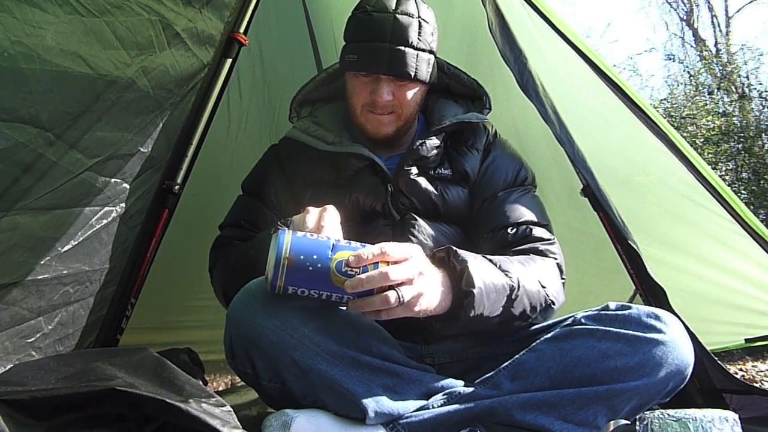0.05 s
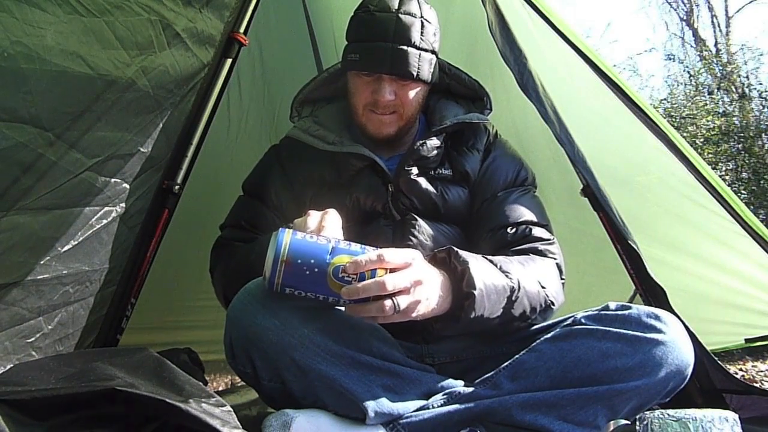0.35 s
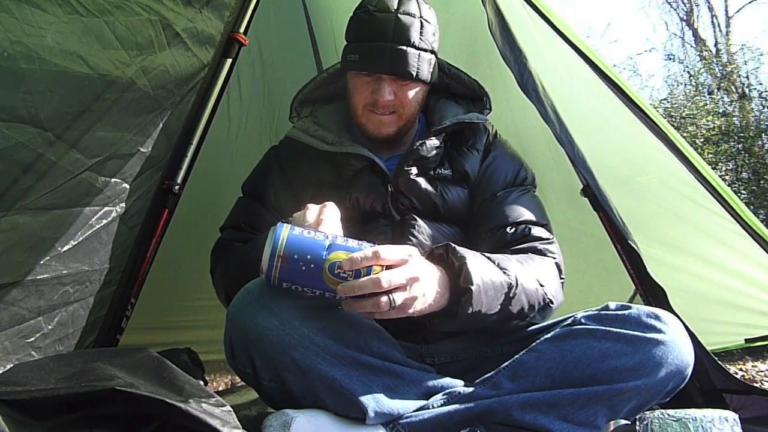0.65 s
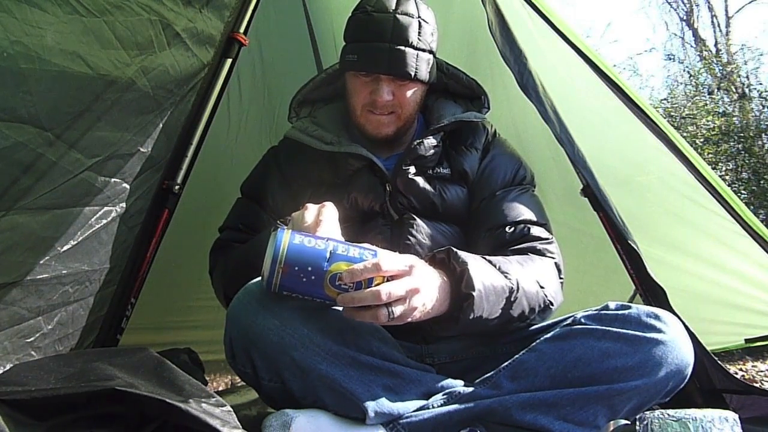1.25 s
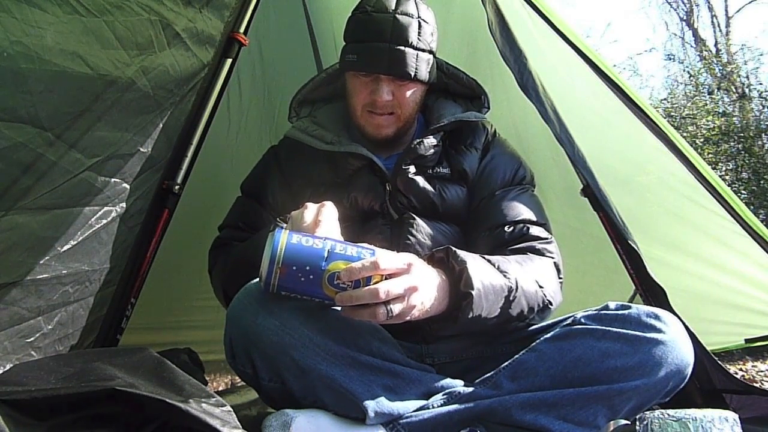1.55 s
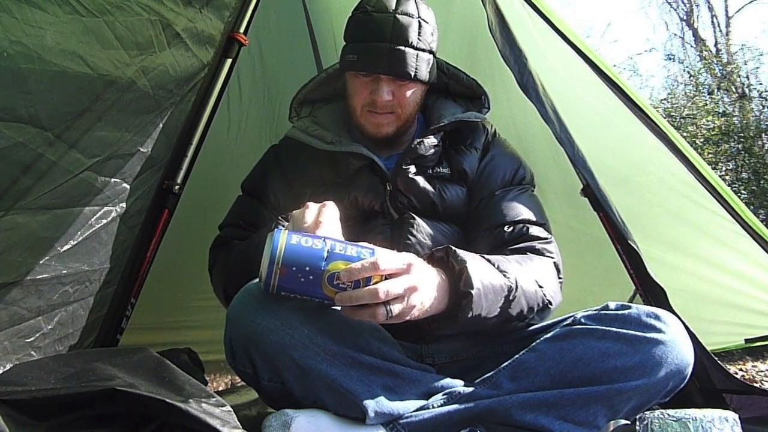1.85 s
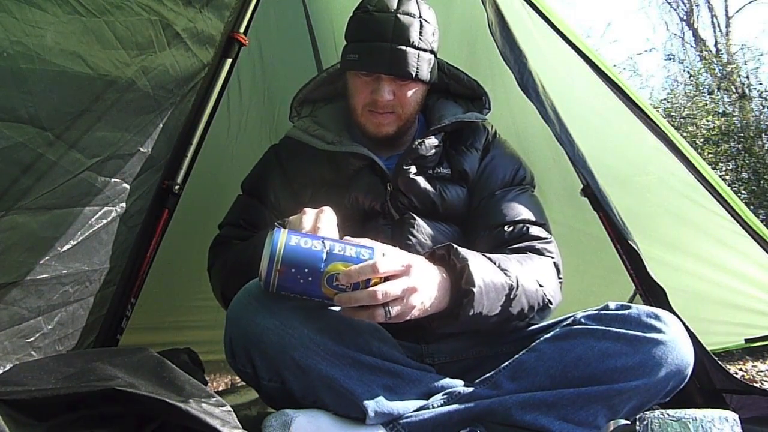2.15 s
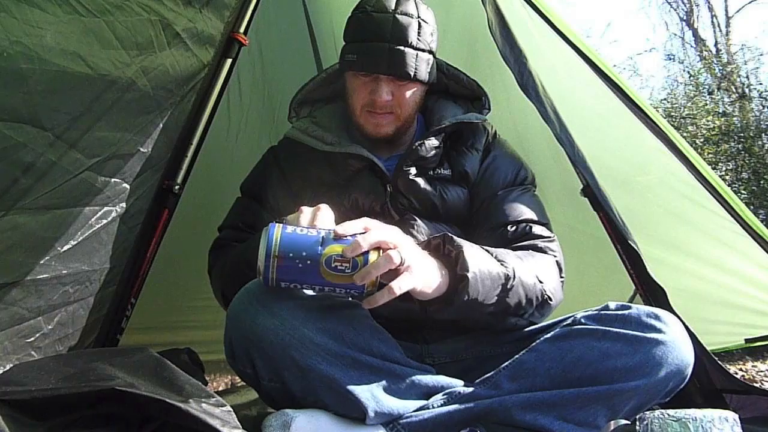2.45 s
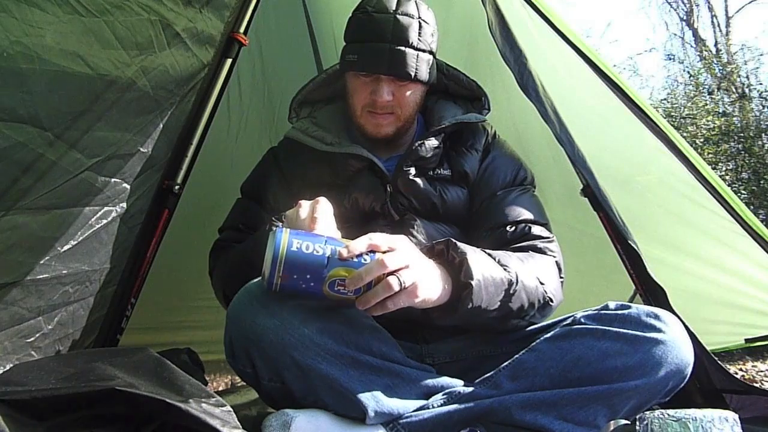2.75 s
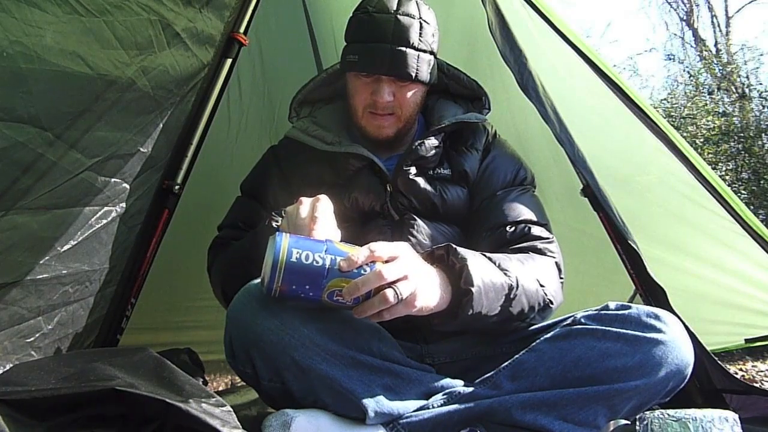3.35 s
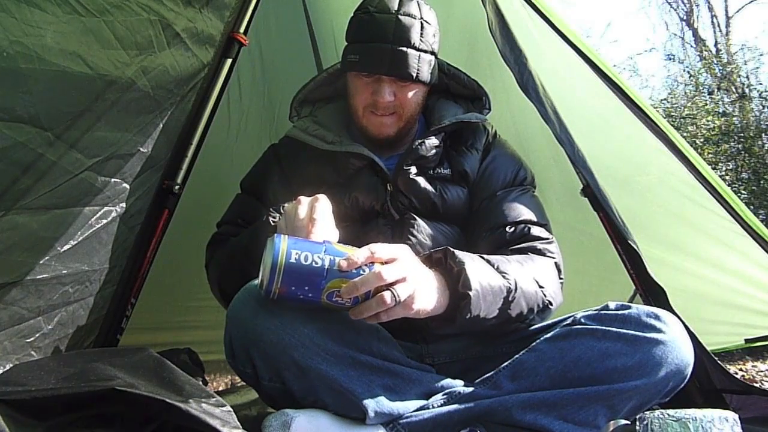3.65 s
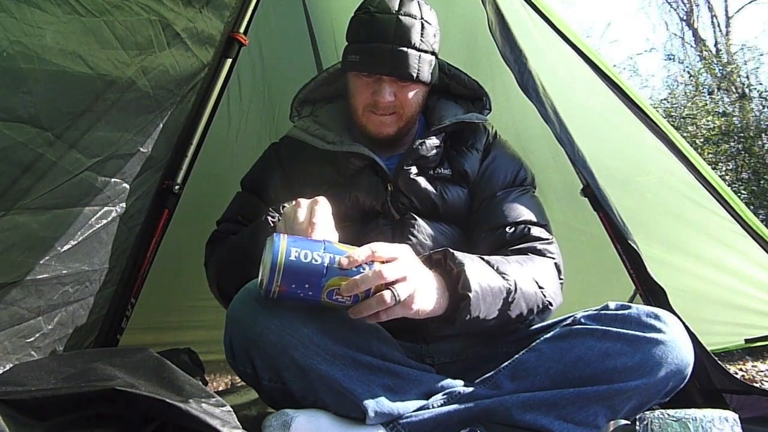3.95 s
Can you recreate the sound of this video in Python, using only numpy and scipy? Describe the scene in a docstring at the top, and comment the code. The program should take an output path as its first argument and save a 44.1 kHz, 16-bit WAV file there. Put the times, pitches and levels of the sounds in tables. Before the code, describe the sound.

A thin metal can is cut close by, with short scrapes, a loud hollow pop near 0.35 seconds and sharp snaps around 0.9 and 1.15. After a pause, scraping resumes at 1.8, snaps cluster from 2.2 to 2.6 and near 3.2, and hollow pops follow at 3.6 and 4. Low wind and a distant, sinking engine drone continue underneath, with faint bird chirps near 1.5 and 3.7.

```python
"""Cutting a thin metal can

A can is cut and turned by hand in an open tent. The sheet scrapes in stick-slip grains, tears in snaps
made of tiny cracks, and now and then buckles with a hollow pop.
Behind it: low wind, a far engine drone that sinks in pitch, a low hum and faint birds."""
import sys
import numpy as np
from scipy import signal
from scipy.fft import rfft, irfft
from scipy.io import wavfile
from scipy.ndimage import uniform_filter1d

SR = 44100
rng = np.random.default_rng(int(sys.argv[2]) if len(sys.argv) > 2 else 0)


def digitize_waveform(pressure):
    """Quantize a signal to 16-bit integers and store it at the path in sys.argv[1].

    Rows of a 2-D input are taken as channels; values are limited to [-1, 1].
    """
    field = np.atleast_2d(pressure).T
    bounded = np.clip(field, -1, 1)
    quanta = np.round(bounded * 32767).astype(np.int16)
    wavfile.write(sys.argv[1], SR, quanta)


N = 176400

# Wall spectrum for scrapes and pop ticks: freq_hz, gain_db
SCRAPE_SPECTRUM = [(100, -22), (300, -1.5), (750, -1), (1000, -4), (1250, 3), (1900, -0.5), (2200, -4),
                   (2550, -1), (3900, -5), (4800, -2.5), (5900, -1.5), (7500, -17.5)]


def undb(db):
    """Decibels to gain."""
    return 10 ** (np.asarray(db) / 20)


def unit(x):
    """Scale to rms 1."""
    return x / np.sqrt(np.mean(x ** 2) + 1e-24)


def decay(t, t60_s):
    """Exponential fade, 60 dB down at t60_s."""
    return np.exp(-np.log(1000) * t / t60_s)


def walk(rate_hz, size):
    """Smooth random drift, spread near 1."""
    hold = max(int(SR / rate_hz), 2)
    steps = np.repeat(rng.standard_normal(size // hold + 1), hold)
    return 1.004 * uniform_filter1d(steps, hold)[:size]


def resonate(x, hz, width_hz):
    """One resonance, gain 1 at its centre."""
    return signal.lfilter(*signal.iirpeak(hz, hz / width_hz, fs=SR), x)


def colour(x, points, size=4096):
    """Minimum-phase filter through (freq_hz, gain_db) points."""
    hz, db = np.array(points).T
    grid_hz = np.maximum(np.fft.rfftfreq(size, 1 / SR), 1)
    gain = undb(np.interp(np.log(grid_hz), np.log(hz), db))
    cepstrum = irfft(np.log(gain))
    cepstrum[1:size // 2] *= 2
    cepstrum[size // 2 + 1:] = 0
    return signal.fftconvolve(x, irfft(np.exp(rfft(cepstrum))))[:len(x)]


def registers(x, low_hz=756, high_hz=3040):
    """Split into bass, middle and treble."""
    edges = [(low_hz, "low"), ([low_hz, high_hz], "band"), (high_hz, "high")]
    return [signal.sosfilt(signal.butter(4, hz, kind, fs=SR, output="sos"), x) for hz, kind in edges]


def add(out, start_s, x):
    """Mix x in at start_s, cropped to out."""
    i = int(round(start_s * SR))
    x, i = x[max(-i, 0):], max(i, 0)
    out[i:i + len(x)] += x[:max(len(out) - i, 0)]


def grains(per_s, spread_db, size):
    """Random impulses of uneven strength and sign."""
    hits = rng.random(size) < per_s / SR
    return hits * undb(spread_db * rng.standard_normal(size)) * rng.choice([-1, 1], size)


def burst_level(x, db, window_s=0.009):
    """Scale x to the energy of rms level db held for window_s."""
    return undb(db) * x * np.sqrt(window_s * SR / np.sum(x ** 2))


def wind(base_db=-42, gust_db=-1.5):
    """Low wind and leaf hiss, swaying in small gusts."""
    # Noise spectrum: freq_hz, density_db
    spectrum = [(12, -31), (20, -16.5), (27, -40.5), (43, -29), (71, -16), (95, -13.5), (113, -8),
                (157, -15.5), (191, -19), (314, -27), (1140, -41), (1230, -43.5), (6460, -55.5),
                (7500, -62.5), (9750, -100), (16500, -120)]
    # Background level, dipping after the loudest snaps: time_s, gain_db
    background_level = [(0, 7), (.6, 3), (1.6, 3.5), (2.3, 2.5), (3.3, 0), (4, 4)]
    air = unit(colour(rng.standard_normal(N), spectrum))
    gain_db = np.interp(np.arange(N) / SR, *np.array(background_level).T)
    return air * undb(base_db + gain_db + gust_db * walk(rate_hz=14, size=N))


def engine(wobble=0.02143, waver_db=1.5):
    """A far engine's tone sinks in pitch and wavers on its way."""
    # Engine tone: time_s, pitch_hz, level_db
    drone = [(0, 117, -39), (.5, 115.7, -38), (0.752, 114.1, -36.5), (1.0, 115.9, -38.5), (1.3, 112.5, -36),
             (1.498, 108.2, -35), (1.68, 108.2, -32), (2.1, 103.3, -40), (2.28, 102.8, -47),
             (2.55, 102.4, -40.5), (2.9, 101, -39), (3.14, 100.3, -35), (3.28, 94.6, -49.5),
             (3.6, 92.2, -43.5), (4, 93, -47.5)]
    t = np.arange(N) / SR
    time_s, pitch_hz, level_db = np.array(drone).T
    hz = np.interp(t, time_s, pitch_hz) * (1 + wobble * walk(rate_hz=20, size=N))
    db = np.interp(t, time_s, level_db) + waver_db * walk(rate_hz=27, size=N)
    return np.sqrt(2) * np.sin(2 * np.pi * np.cumsum(hz) / SR) * undb(db)


def hum(centre_hz=67, width_hz=43, level_db=-52):
    """A low, steady band of noise."""
    band = resonate(rng.standard_normal(N), centre_hz, width_hz)
    return undb(level_db) * unit(resonate(band, centre_hz, width_hz))


def birds(size=20000, waver=0.014, trees_t60_s=0.6, trees_db=-1.0, trees_lag_s=0.012):
    """Thin chirps arch up and drop, loudest on the way down; the trees echo them."""
    # Far chirps: start_s, length_s, top_hz, peak_db
    chirps = [(1.388, 0.057, 5720, -56.5), (1.487, 0.083, 5740, -68), (1.69, 0.03, 5360, -56),
              (3.681, 0.046, 5620, -55), (3.742, 0.049, 5436, -57)]
    out, t = np.zeros(N), np.arange(size) / SR
    for start_s, length_s, top_hz, peak_db in chirps:
        progress = t / length_s
        arch = np.interp(progress, [0, 0.63, 1], [0.958, 1, 0.9])
        hz = top_hz * arch * (1 + waver * walk(rate_hz=430, size=size))
        envelope = np.interp(progress, [0, 0.8, 1], [0, 1, 0])
        note = undb(peak_db) * envelope * np.sin(2 * np.pi * np.cumsum(hz) / SR)
        trees = unit(rng.standard_normal(size) * decay(t, trees_t60_s)) / np.sqrt(size)
        add(out, start_s, note)
        add(out, start_s + trees_lag_s, undb(trees_db) * signal.fftconvolve(note, trees)[:size])
    return out


def can_wall(push, modes_db=-10, size=11025):
    """A push excites a sharp front, a hand-damped wash and a few modes; the tent adds a brief tail."""
    # Wall modes: freq_hz, relative_db, t60_s
    wall_modes = [(309.2, -9.5, 0.32), (428, -10.5, .35), (606.5, -11.5, 0.16), (718.4, -11, 0.13),
                  (1280, -2.5, 0.11), (1928, -3.5, .1), (2019, -5.5, 0.1), (2426, -1, 0.079),
                  (2517, -2, 0.11), (2712, -2, 0.067), (2918, -9.5, .1), (3550, -8.5, 0.075),
                  (4340, -4, 0.059), (4920, -2.5, .055), (5720, -3.5, 0.077), (7040, -4.5, 0.07)]
    scatter_db = 4  # mode levels change with the contact point
    front_db, tent_db = -7.5, -9  # relative to the wash, as is modes_db
    wash_t60_s, tent_t60_s = 0.026, 0.063
    t, modes = np.arange(size) / SR, np.zeros(size)
    for hz, db, t60_s in wall_modes:
        gain = undb(db + scatter_db * rng.standard_normal())
        modes += gain * np.sin(2 * np.pi * (hz * t + rng.random())) * decay(t, t60_s)
    front = undb(front_db) * unit(signal.unit_impulse(size))
    wash = unit(rng.standard_normal(size) * decay(t, wash_t60_s))
    tent = undb(tent_db) * unit(rng.standard_normal(size) * decay(t, tent_t60_s))
    response = front + wash + undb(modes_db) * unit(modes) + tent
    return signal.fftconvolve(push, response)[:len(push)]


def scrapes(size=14000, contacts=3, grains_per_s=2600, flutter_db=1.5, ring_db=2, bass_offset_db=-5.5):
    """Stick-slip grains at several contacts shake the wall and the hollow; strokes swell and fade."""
    # Strokes: start_s, crest_s, end_s, hollow_db, middle_db, treble_db, hollow_hz, ring_hz
    strokes = [(-.03, 0.013, 0.083, -23, -32.5, -37, 417.3, 1480),
               (0.179, 0.235, 0.28, -35.5, -52, -57, 418, 2480),
               (0.293, 0.34, 0.35, -41.5, -58.5, -68, 422, 2580),
               (0.543, 0.554, 0.6, -46.5, -54, -62, 403, 1880),
               (0.667, 0.74, 0.79, -34, -44, -47.5, 408, 1970),
               (0.805, 0.846, 0.88, -33, -41.5, -43.5, 400, 5720),
               (0.864, 0.878, 1, -34, -43, -45.5, 420, 1320),
               (1.053, 1.09, 1.12, -32, -48.5, -54.5, 407.7, 1340),
               (1.794, 1.809, 1.94, -40, -53, -58, 434, 2630),
               (1.879, 1.947, 2.017, -37.5, -47.5, -54.5, 442, 2870),
               (2.044, 2.085, 2.18, -41, -50.5, -56.5, 470, 2640),
               (2.081, 2.101, 2.14, -37, -38, -42.5, 452.6, 1900),
               (2.517, 2.529, 2.71, -52.5, -55.5, -56, 449, 1981),
               (2.621, 2.654, 2.8, -48.5, -48.5, -54.5, 442, 1850),
               (2.772, 2.777, 2.868, -51, -44.5, -48, 441.6, 1856),
               (2.894, 2.904, 3.04, -47.5, -47.5, -51.5, 430.8, 4910),
               (2.912, 2.957, 3.1, -41.5, -46, -54.5, 744, 1129),
               (2.995, 3.005, 3.14, -45, -57.5, -60, 442, 1280),
               (3.045, 3.06, 3.096, -38.5, -43.5, -53, 465, 1280),
               (3.714, 3.724, 3.755, -41, -69, -63, 440, 1280),
               (3.822, 3.826, 4.9, -46, -67, -68, 456, 601),
               (3.874, 3.886, 4.44, -39, -58, -56.5, 497, 4830),
               (3.89, 3.987, 4.15, -30, -46, -50.5, 485, 583)]
    out, t = np.zeros(N), np.arange(size) / SR
    for start_s, crest_s, end_s, hollow_db, middle_db, treble_db, hollow_hz, ring_hz in strokes:
        grip = undb(flutter_db * walk(rate_hz=78, size=size))
        pushes = [grip * grains(grains_per_s / contacts, spread_db=3.5, size=size)
                  for _ in range(contacts)]
        wall = colour(sum(can_wall(push, size=5000) for push in pushes), SCRAPE_SPECTRUM)
        bass, middle, treble = registers(wall + undb(ring_db) * resonate(wall, ring_hz, width_hz=79))
        hollow = resonate(sum(pushes), hollow_hz, width_hz=36)
        hollow = resonate(hollow, hollow_hz, width_hz=0.3 * hollow_hz)  # steeper skirts
        force = np.interp(start_s + t, [start_s, crest_s, end_s], [0, 1, 0]) ** 0.84
        parts = [(hollow, hollow_db), (bass, middle_db + bass_offset_db),
                 (middle, middle_db), (treble, treble_db)]
        stroke = sum(undb(db) * unit(force * band) for band, db in parts)
        add(out, start_s, stroke * np.sqrt(np.mean(force ** 2)))
    return out


def pops(size=9000, rise_s=0.00087, knock_db=-14):
    """The wall buckles: the hollow can rings briefly, with a dull knock and a faint tick."""
    # Buckles: start_s, pitch_hz, level_db, tick_db, t60_s
    buckles = [(0.0703, 421, -20.5, -55, 0.062), (0.3497, 427, -10, -42.5, 0.05),
               (.706, 402, -24.5, -53, 0.065), (.893, 424, -29, -39, 0.22), (1.163, 418, -31, -56, 0.14),
               (2.307, 430, -20.5, -49.5, 0.055), (3.5699, 479.7, -15.5, -41, 0.046),
               (3.734, 378, -25.5, -56, 0.022), (3.9625, 505, -16, -40, 0.037)]
    out, t = np.zeros(N), np.arange(size) / SR
    for start_s, pitch_hz, level_db, tick_db, t60_s in buckles:
        envelope = (1 - np.exp(-t / rise_s)) * decay(t, t60_s)
        knock = resonate(rng.standard_normal(size), pitch_hz, width_hz=pitch_hz / 2)
        knock = unit(resonate(knock, pitch_hz, width_hz=pitch_hz))
        hollow = envelope * (np.sin(2 * np.pi * pitch_hz * t) + undb(knock_db) * knock)
        tick = colour(can_wall(signal.unit_impulse(size)), SCRAPE_SPECTRUM)
        add(out, start_s, undb(level_db) * hollow + burst_level(tick, tick_db))
    return out


def snaps(size=13000, cracks_per_s=1300, crack_db=-14.5, low_ring_db=5.5, high_ring_db=0.5):
    """The sheet tears: one main crack early in a burst of small ones rings the nearby wall."""
    # Tears: start_s, tear_s, bass_db, middle_db, treble_db, low_ring_hz, high_ring_hz, modes_db
    tears = [(0.3741, .006, -35, -40, -31, 1255, 5300, -9.5),
             (.674, 0.0054, -42, -57, -57, 1950, 5850, -10),
             (0.705, 0.0027, -41.5, -40.5, -48, 1970, 3300, -8),
             (0.8653, 0.0073, -40, -33, -25.5, 1320, 5800, -11),
             (1.096, 0.0056, -39.5, -46, -49, 1260, 5500, -18),
             (1.1538, 0.0071, -52, -32.5, -25.5, 1274, 3550, -9.5),
             (1.8701, 0.00693, -50, -51.5, -46, 2400, 5700, -13),
             (2.194, 0.0013, -33.5, -21.5, -22.5, 2470, 4640, -15),
             (2.2215, 0.006, -62, -47, -48.5, 2520, 5200, -10),
             (2.3043, .014, -31.5, -30.5, -33, 1940, 4250, -8),
             (2.3417, 0.0071, -35.5, -27.5, -32.5, 2600, 4900, -8),
             (2.348, .007, -31, -25.5, -30, 2470, 5260, -7.5),
             (2.431, .008, -52.5, -51, -57.5, 2680, 4900, -9),
             (2.594, .016, -42, -39.5, -32, 2720, 5340, -10.5),
             (3.0575, .003, -37.5, -47.5, -58, 1230, 2610, -7.5),
             (3.1462, 0.0073, -36.5, -42.5, -36.5, 2880, 4650, -10),
             (3.1771, 0.0052, -32.5, -28, -24, 2390, 6600, -12),
             (3.8837, 0.0052, -43, -50.5, -58, 1310, 3308, -8),
             (3.963, 0.0034, -28, -38, -40.5, 2700, 4900, -10)]
    # Wall spectrum for cracks: freq_hz, gain_db
    spectrum = [(100, -17.5), (300, -6.5), (500, 3), (950, -10.5), (1900, -1.5), (2170, -7.5), (2420, -2),
                (3300, -0.5), (3900, 0.5), (4400, 7.5), (5150, 2), (5700, 6), (6800, 3.5), (7600, -11.5)]
    out, t = np.zeros(N), np.arange(size) / SR
    for start_s, tear_s, *bands_db, low_ring_hz, high_ring_hz, modes_db in tears:
        cracks = undb(crack_db) * grains(cracks_per_s, spread_db=1.5, size=size) * (t < tear_s)
        cracks[int(0.16 * tear_s * SR)] = 1  # main crack
        wall = colour(can_wall(cracks, modes_db), spectrum)
        high_ring = undb(high_ring_db) * resonate(wall, high_ring_hz, width_hz=360)
        low_ring = undb(low_ring_db) * resonate(wall, low_ring_hz, width_hz=120)
        bands = registers(wall + high_ring + low_ring)
        add(out, start_s, sum(burst_level(band, db) for band, db in zip(bands, bands_db)))
    return out


def scene():
    """The can close by, the outdoors behind it; mono."""
    can = snaps() + pops() + scrapes()
    outdoors = birds() + wind() + engine() + hum()
    return (can + outdoors)[None]


def record(dry):
    """Steep low-pass and a small DC offset."""
    cutoff_hz, dc_offset = 7700, 0.018
    return signal.sosfilt(signal.cheby1(12, 0.3, cutoff_hz, fs=SR, output="sos"), dry) + dc_offset


dry = scene()
out = record(dry)
digitize_waveform(out)
```